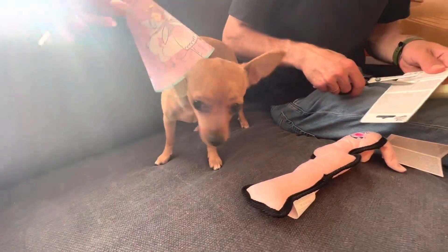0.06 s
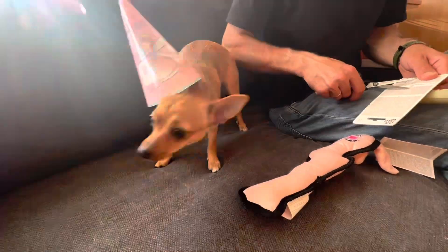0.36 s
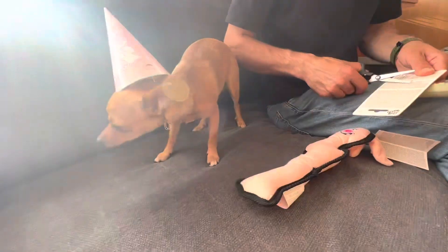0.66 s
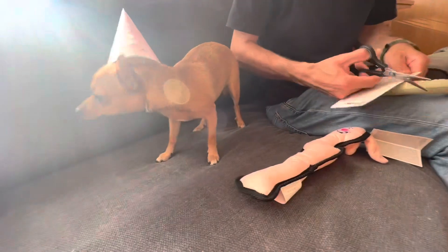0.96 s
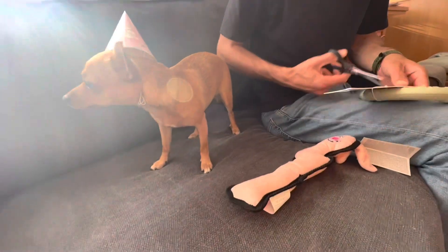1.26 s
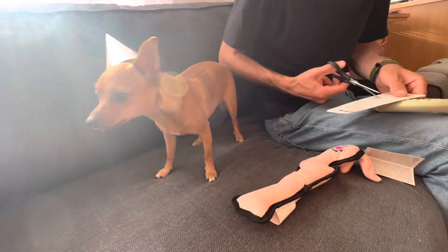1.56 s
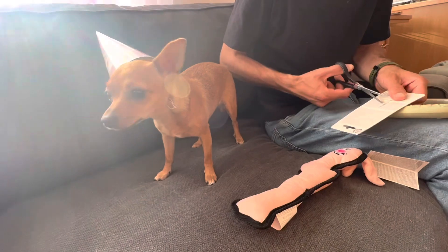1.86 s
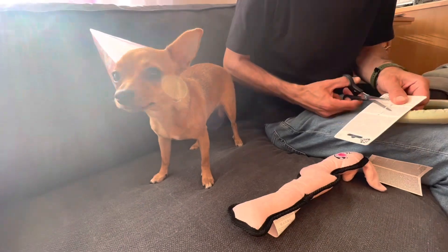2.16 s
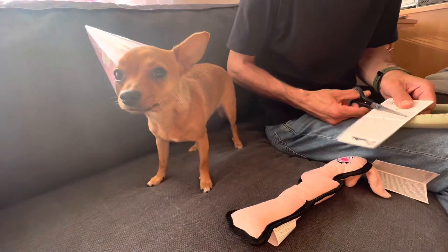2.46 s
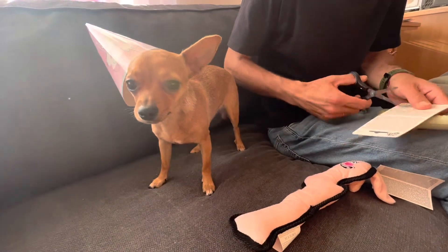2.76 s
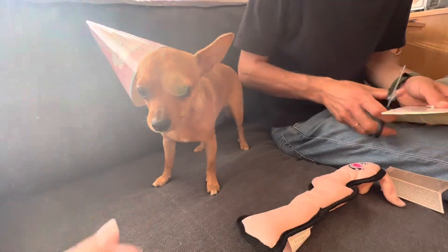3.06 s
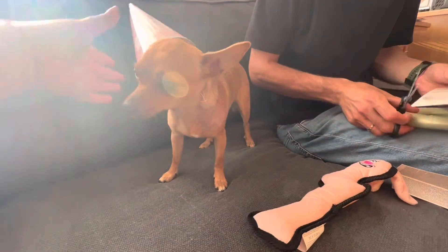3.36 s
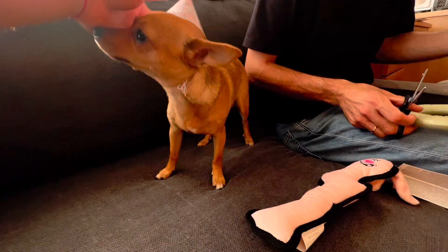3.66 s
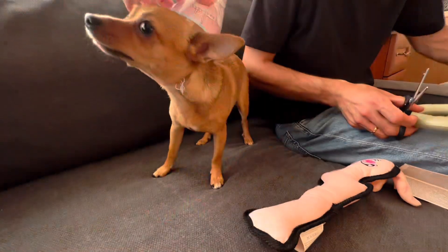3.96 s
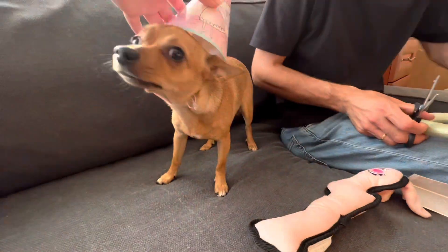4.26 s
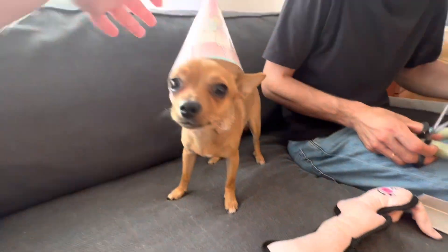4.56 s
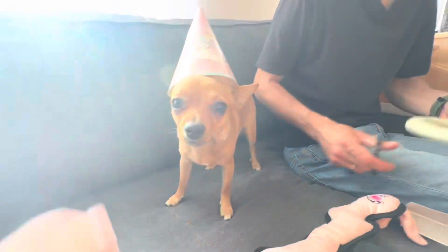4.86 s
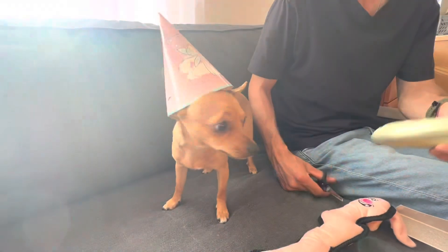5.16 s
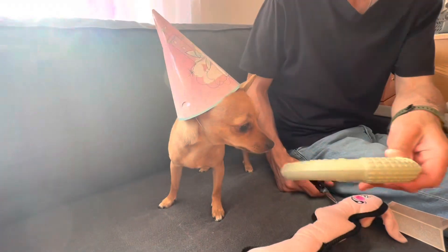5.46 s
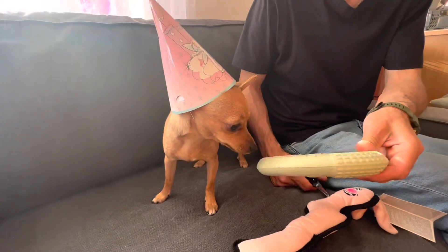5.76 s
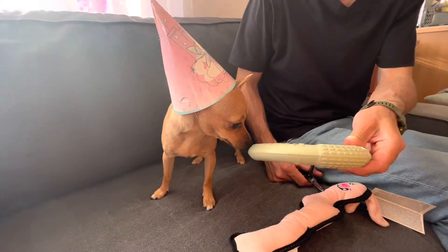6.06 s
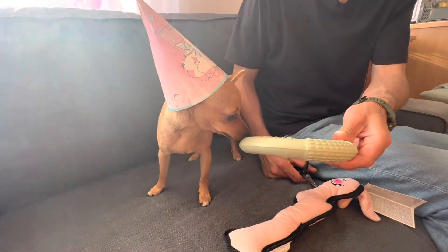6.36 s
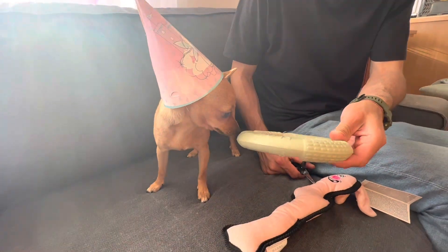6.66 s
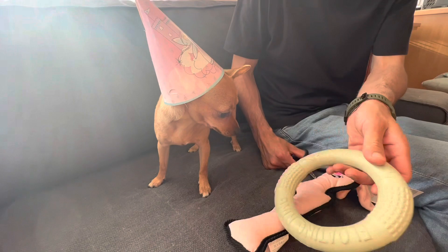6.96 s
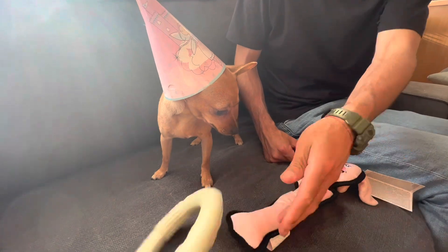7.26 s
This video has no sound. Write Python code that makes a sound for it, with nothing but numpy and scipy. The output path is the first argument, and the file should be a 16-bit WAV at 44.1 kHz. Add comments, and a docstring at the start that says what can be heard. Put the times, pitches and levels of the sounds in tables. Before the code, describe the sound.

Scissors snip two plastic ties amid light clicks, paper rustles and cushion thumps, then a rubber ring lands softly, over a low hum.

```python
"""On a sofa in a small room, over a mains hum and a faint hiss, a small dog's paper hat rustles.
Scissors click, then snip two plastic ties off a toy's backing card, at 0.8 s and 2.4 s: each tie
cracks, and the blades ring. Meanwhile the card is bumped and sleeves slide over jeans.
Hands and paws then thump the cushions, the scissors click on, and near 4 s the hat rustles again.
Last, cloth swishes as a rubber ring is held out, and at 7.3 s it is tossed down with a soft thud."""
import sys
import numpy as np
from scipy import signal
from scipy.fft import rfft, irfft, next_fast_len
from scipy.io import wavfile

SR = 44100
rng = np.random.default_rng(int(sys.argv[2]) if len(sys.argv) > 2 else 0)


def put_to_file(sound):
    """Save the sound as 16-bit audio at rate SR, in the file named by the first command-line argument."""
    columns = np.atleast_2d(sound).T  # one column per channel
    safe = np.clip(columns, -1, 1)
    whole_steps = np.round(safe * 32767)
    wavfile.write(sys.argv[1], SR, whole_steps.astype(np.int16))


N = 327164
HIT_SIZE = 16384  # samples in one short sound
TIME, AGE = np.arange(N) / SR, np.arange(HIT_SIZE) / SR  # seconds into the scene, and into a hit
TOP_HZ, CUSHION_DECAY_S = 15800, 0.051

# mains hum and a weaker low drone: pitch_hz, level_db
HUM_TONES = [(99.95, -51), (130, -66)]
# tone colour of the room's still air: pitch_hz, gain_db
AIR_COLOUR = [(130, -26.5), (280, -28), (450, -34), (850, -36), (1400, -40.5), (2500, -47), (4000, -47),
              (5000, -44), (6000, -52.5), (7200, -43), (8500, -48), (10500, -64), (15000, -58)]
# a narrow hiss and a faint whine: pitch_hz, width_hz, level_db
HISS_BANDS = [(2000, 170, -71), (6740, 42, -79)]
# the room's echo (a fade is the time to drop by 60 dB): pitch_hz, fade_s, gain_db
ROOM_ECHO = [(200, 0.24, -3), (380, 0.2, -9), (822, 0.26, -1), (1750, 0.53, -13), (4000, 0.41, -10),
             (8660, 0.38, -3), (14700, 0.089, -18.5)]
# tone colour of the rustling hiss, with a deep dip near 11 kHz: pitch_hz, gain_db
RUSTLE_COLOUR = [(200, -2), (600, 0.5), (1300, -2.5), (1800, 3.5), (2300, -12.5), (2900, 4), (4000, 5),
                 (6500, 1), (9000, 2.5), (11000, -20.5), (13000, -3), (15500, -16.5)]
# the hat rubs as the dog turns and a hand sets it straight: start_s, length_s, level_db
PAPER_RUBS = [(0.02, 0.034, -52), (0.225, 0.033, -44.5), (3.655, 0.047, -49.5), (3.72, 0.12, -57.5),
              (3.91, 0.074, -53), (3.96, 0.084, -52.5), (4.08, 0.024, -52)]
# hollow notes of the hat's paper cone, compared with its hiss: low_hz, high_hz, gain_db
HAT_BANDS = [(726, 983, -4.5), (1750, 2200, -13.5), (2700, 3650, -14)]
# hands and sleeves slide over card and jeans: start_s, length_s, hiss_db, fabric_db
SLEEVE_SLIDES = [(0.13, 0.13, -62, -63.5), (0.513, 0.43, -66, -94), (1.32, 0.2, -67, -65),
                 (2.018, 0.34, -67.5, -68.5), (2.56, 0.53, -62.5, -69.5), (3.084, 0.19, -58.5, -62.5),
                 (4.25, 0.035, -62.5, -58.5), (4.61, 0.14, -63, -86), (4.816, 0.48, -64.5, -67),
                 (5.607, 0.19, -71.5, -69), (7.244, 0.025, -53, -64)]
# cloth swishes as the ring is held out: start_s, length_s, level_db
CLOTH_SWISHES = [(5.64, 0.022, -58), (5.95, 0.054, -65.5), (6.36, 0.072, -69)]
# dull knocks on card and hat: start_s, level_db, decay_s, left_minus_right_db
CARD_KNOCKS = [(0.931, -39, 0.0053, -4), (1.206, -43, 0.075, 6), (1.535, -43.5, 0.047, 5),
               (1.897, -41.5, 0.056, -10), (1.919, -41.5, 0.043, 13), (3.113, -50, 0.011, -6),
               (3.905, -43, 0.0047, 8), (5.111, -54, 0.041, 5), (5.201, -52, 0.023, 6)]
# hands and paws press into the cushions: start_s, level_db, pitch_hz
CUSHION_THUMPS = [(2.572, -34, 80), (3.271, -36.5, 60.7), (3.963, -35, 73.6), (4.156, -38.5, 227),
                  (5.109, -42.5, 200)]
# the rubber ring is let go, then lands: start_s, thump_db, contact_s
RUBBER_HITS = [(7.2639, -38, 0.002), (7.271, -31.5, 0.0089), (7.396, -31, 0.0017), (7.3974, -26.5, 0.0013)]
# the rubber's very short tones, compared with its slap: pitch_hz, gain_db, decay_s
RUBBER_TONES = [(277, 2.5, 0.00085), (980, -3.5, 0.0016), (3340, -10, 0.00052)]
# the blades scrape as they move: start_s, length_s, level_db
BLADE_SCRAPES = [(0.565, 0.035, -66), (1.425, 0.02, -56), (2.862, 0.024, -57), (5.19, 0.034, -63),
                 (7.09, 0.015, -63)]
# light clicks of blades, pivot and plastic: start_s, base_db, pitch_hz, tone_gain_db, treble_gain_db
SCISSOR_CLICKS = [(0.038, -47, 2050, 7.5, -11), (0.6285, -67.5, 4000, 16, 11), (0.685, -64, 4750, 17, -6),
                  (0.705, -34, 2400, 1.5, -13), (1.201, -50.5, 1490, 5, -7.5),
                  (1.215, -57.5, 5370, 8.5, -7), (1.25, -35.5, 1310, -4.5, -26),
                  (1.4983, -35, 1780, -7, -28), (1.727, -37, 4380, -1.5, -19),
                  (1.895, -47.5, 1480, 2.5, -6), (2.702, -52, 2180, -2, -11), (2.714, -41, 1560, -1.5, -21),
                  (3.172, -49.5, 1400, 3.5, -11), (3.2571, -43.5, 3870, -5, -1),
                  (3.898, -46.5, 2600, -4, -11.5), (4.125, -61, 5670, -8, 5),
                  (4.8813, -44.5, 2700, -0.5, 4)]
# short tones of clicking steel, muffled by the hand: pitch_hz, gain_db, fade_s
CLICK_TONES = [(870, -17, 0.016), (1490, -9, 0.024), (2250, -11, 0.014), (2700, -16, 0.012),
               (4150, -11.5, 0.011), (4750, -15, 0.011)]
# tone colour of a crack on the card: pitch_hz, gain_db
CRACK_COLOUR = [(380, -31), (700, -8.5), (1080, -3.5), (1400, 1.5), (2200, 0), (3200, -8), (4200, -8.5),
                (5600, -6.5), (7600, -9.5), (8800, -5), (11300, -13.5), (13500, -3), (16000, -19)]
# scissors and card ring with each crack: pitch_hz, gain_db, fade_s
CRACK_TONES = [(505, -17.5, 0.055), (888, -12.5, 0.07), (1220, -17, 0.045), (1394, -13.5, 0.025),
               (1830, -12, 0.06), (2110, -13, 0.03), (2650, -18, 0.03), (2920, -16, 0.045),
               (4040, -19, 0.02), (4770, -17.5, 0.022), (6250, -23, 0.035)]
# the blades ring on after a snip: pitch_hz, gain_db, fade_s
BLADE_TONES = [(1455, -25, 0.8), (1502, -22.5, 1.1), (1534, -22, 1.1), (1590, -24, 0.8), (1815, -23, 0.45)]
# the scissors close on a tie, which snaps:
# start_s, base_db, closing_s, snap_gain_db, snap_pitch_hz, snap_treble_gain_db, ring_gain_db
TIE_SNIPS = [(0.8391, -25, 0.0034, 3, 4040, -11, 1), (2.4441, -24.5, 0.0063, -1.5, 4840, 5.5, -8)]
# the left microphone is shaded from the scissors: pitch_hz, left_minus_right_db
LEFT_SHADE = [(200, 6), (600, -3), (1000, -8), (2000, -9.5), (4000, -2.5), (9000, 3)]


def undb(db):
    """Turn decibels into a number to multiply by."""
    return 10 ** (np.asarray(db) / 20)


def level(x, db):
    """Set the average (rms) level of a steady sound."""
    return x * undb(db) / np.sqrt(np.mean(x ** 2))


def hit_level(x, db):
    """Give a hit the energy of 4 ms of steady sound at this level."""
    return x * undb(db) * np.sqrt(.004 * SR / np.sum(x ** 2))


def band(x, low_hz, high_hz, order=2):
    """Keep what lies between two pitches; a higher order cuts more sharply."""
    edges_hz = [low_hz, min(high_hz, SR / 2 - 1)]
    return signal.sosfilt(signal.butter(order, edges_hz, "band", fs=SR, output="sos"), x)


def colour(x, points):
    """Turn pitches up or down along a curve of (pitch_hz, gain_db) points."""
    size = 2 * next_fast_len(x.shape[-1] // 2 + 1)
    hz, db = np.transpose(points)
    curve_db = np.interp(np.log(np.fft.rfftfreq(size, 1 / SR) + 1), np.log(hz), db)
    cepstrum = irfft(np.log(undb(curve_db)))
    # fold the filter in time so that nothing sounds before its cause
    cepstrum[1:size // 2] *= 2
    cepstrum[size // 2 + 1:] = 0
    return irfft(rfft(x, size) * np.exp(rfft(cepstrum)))[..., :x.shape[-1]]


def pan(x, db):
    """Make the left side this many decibels louder than the right."""
    return x * undb(np.array([[db], [-db]]) / 2)


def stereo_noise(likeness):
    """Left and right noise: unrelated at likeness 0, the same at 1."""
    mid, side = rng.standard_normal((2, N))
    return np.sqrt((1 + likeness) / 2) * mid + np.sqrt((1 - likeness) / 2) * side * np.array([[1], [-1]])


def wander(rate_hz):
    """Glide from one random value to the next, mostly between -1 and 1."""
    values = rng.standard_normal(HIT_SIZE)
    return np.interp(TIME * rate_hz, np.arange(len(values)), values)


def burst(decay_s, rise_s=0):
    """A puff of noise that builds up and dies away."""
    onset = np.minimum((AGE + 1 / SR) / (rise_s + 1 / SR), 1)
    return rng.standard_normal(HIT_SIZE) * np.exp(-AGE / decay_s) * onset


def tone(hz, decay_s):
    """One pure note that dies away."""
    return np.sin(2 * np.pi * hz * AGE) * np.exp(-AGE / decay_s)


def ringing(tones, scatter_db=0.5):
    """Each hit wakes an object's tones a little differently; neighbouring tones swing opposite ways."""
    chance_db = scatter_db * rng.standard_normal(len(tones))
    return sum((-1) ** k * hit_level(tone(hz, fade_s / np.log(1000)), db + chance_db[k])
               for k, (hz, db, fade_s) in enumerate(tones))


def add(out, start_s, x):
    """Mix a hit in at its time."""
    i = int(start_s * SR)
    out[:, max(i, 0):i + x.shape[-1]] += x[..., max(-i, 0):N - i]


def background():
    """A wavering mains hum, a low rumble and a wide, faint hiss."""
    hum = sum(undb(db) * np.sqrt(2) * np.sin(2 * np.pi * hz * TIME) for hz, db in HUM_TONES)
    hum *= undb(1.9 * wander(31))
    low_noise = band(stereo_noise(1.0), 50, 77.7, order=1)
    rumble = level(band(low_noise, 22, 250, order=3), db=-57)
    air = band(colour(stereo_noise(0.024), AIR_COLOUR), 120, TOP_HZ)
    air = level(air, db=-64.5) * undb(.5 * wander(16))
    hiss = sum(level(band(stereo_noise(0.041), hz - width / 2, hz + width / 2, order=1), db)
               for hz, width, db in HISS_BANDS)
    return pan(hum + rumble, 4.0) + pan(air + hiss, 1.0)


def room(x, build_s=0.0024, early_db=-11, early_s=0.028, linger_db=-26, linger_hz=1570, linger_s=0.41):
    """Near surfaces answer first, then a wash of echo; the top treble dies soonest, one band lingers."""
    hz, fade_s, db = np.transpose(ROOM_ECHO)
    # cut noise into pitches and let each fade at its own speed
    pitches, times, cells = signal.stft(rng.standard_normal((2, 2 * HIT_SIZE)), SR, nperseg=256)
    fall = np.log(1000) / np.interp(pitches, hz, fade_s)[:, None]
    gain = undb(np.interp(pitches, hz, db))[:, None] * np.sqrt(2 * fall / SR)
    tail = signal.istft(cells * gain * np.exp(-fall * times), SR)[1]
    age = np.arange(tail.shape[1]) / SR
    early, late = rng.standard_normal((2,) + tail.shape)
    early = early * np.exp(-age / early_s) * undb(early_db) * np.sqrt(2 / early_s / SR)
    late = band(late, linger_hz / 2.8, linger_hz)
    late = late * np.exp(-age / linger_s) * undb(linger_db) * np.sqrt(2 / linger_s / SR)
    response = (tail + early + late) * (1 - np.exp(-(age / build_s) ** 2))
    return signal.fftconvolve(x.mean(axis=0)[None], response, axes=1)[:, :N]


def rub_strength(rubs, attack_s=0.04, release_s=0.05):
    """Each rub swells and dies away; overlapping rubs add their power."""
    power = np.zeros(N)
    for start_s, length_s, db in rubs:
        attack = np.clip((TIME - start_s) / attack_s, 0, 1)
        release = np.exp(-np.maximum(TIME - start_s - length_s, 0) / release_s)
        power += (undb(db) * attack * release) ** 2
    return np.sqrt(power)


def friction(rubs, low_hz, high_hz, grain_db=3.0):
    """Grainy rubbing in one narrow band of pitches."""
    grainy = stereo_noise(0.14) * undb(grain_db * wander(300))
    return level(band(grainy, low_hz, high_hz), 0) * rub_strength(rubs)


def crackles(bands=4, ticks_per_s=110, spread_db=3):
    """Scattered tiny ticks of unequal size, some higher and some lower."""
    out = 0
    for hz in np.geomspace(2400, 6000, bands):
        sizes = undb(spread_db * np.clip(rng.standard_normal(N), -2, 2))
        kicks = (rng.random(N) < ticks_per_s / bands / SR) * sizes
        ticks = signal.fftconvolve(kicks, burst(0.0012))[:N]
        out = out + level(band(ticks, hz / 1.5, hz * 1.5, order=3), 0)
    return level(out, db=-8)


def rustle(jerk_db=1.23):
    """Paper and cloth catch and slip; the cone of the hat adds a hollow note and a rasp."""
    on_hat = rub_strength(PAPER_RUBS)
    on_card = rub_strength([(start_s, length_s, db) for start_s, length_s, db, _ in SLEEVE_SLIDES])
    on_fabric = rub_strength([(start_s, length_s, db) for start_s, length_s, _, db in SLEEVE_SLIDES])
    catch = undb(jerk_db * wander(70))
    hiss = level(colour(stereo_noise(0.04) * catch, RUSTLE_COLOUR), 0)
    hiss = level(hiss + crackles(), 0)
    # the cone's notes come and go as the fingers move over it
    hat = sum(level(band(stereo_noise(0.071) * catch * undb(3.5 * wander(45)), low_hz, high_hz), db)
              for low_hz, high_hz, db in HAT_BANDS)
    fabric = level(band(stereo_noise(0.076) * catch, 440, 4000), 0)
    return pan(hiss * np.hypot(on_hat, on_card) + hat * on_hat + fabric * on_fabric, 1.2)


def knock(db, hz, decay_s, spread=1.53):
    """A dull knock: a puff of noise spread widely around one pitch."""
    body = band(burst(decay_s), hz / spread, hz * spread, order=1)
    return hit_level(band(body, 120, 4720), db)


def thump(db, hz, decay_s):
    """A soft, low blow, a little to the left."""
    body = band(burst(decay_s), hz / 1.6, hz * 1.264, order=3)
    return pan(hit_level(body, db), 4.5)


def handling():
    """Card and hat are bumped, the freed card springs back after each snip, the cushions are pressed."""
    out = np.zeros((2, N))
    for start_s, db, decay_s, pan_db in CARD_KNOCKS:
        hz = 704 * (decay_s / .01) ** -0.17  # a softer contact lasts longer and sounds lower
        add(out, start_s, pan(knock(db, hz, decay_s), pan_db))
    for start_s, db, *_ in TIE_SNIPS:
        add(out, start_s + 0.0037, thump(db - 14.5, hz=204.5, decay_s=0.0255))
    for start_s, db, hz in CUSHION_THUMPS:
        add(out, start_s, thump(db, hz, CUSHION_DECAY_S))
    return out


def rubber_ring(scuff_hz=3620, scuff_spread=1.34, sink_lag_s=0.0022):
    """Each contact slaps the rubber, scuffs the fabric and sinks into the cushion."""
    out = np.zeros((2, N))
    for start_s, db, contact_s in RUBBER_HITS:
        slap_db = db - 21 + 6 * np.log2(.01 / contact_s)  # a shorter contact slaps harder
        tones = sum(hit_level(tone(hz, decay_s), slap_db + gain_db)
                    for hz, gain_db, decay_s in RUBBER_TONES)
        slap = knock(slap_db, hz=543, decay_s=contact_s, spread=1.44)
        add(out, start_s, pan(slap + tones, 10))
        slips = burst(contact_s, rise_s=contact_s / 2)
        scuff = band(slips, scuff_hz / scuff_spread, scuff_hz * scuff_spread, order=3)
        add(out, start_s, pan(hit_level(scuff, db - 15), -8))
        add(out, start_s + sink_lag_s, thump(db, hz=103, decay_s=0.027))
    return out


def from_right(x, left_lag_s=0.0003017):
    """Sound from the right reaches the left microphone later, with weaker middle pitches."""
    delayed = np.interp(TIME - left_lag_s, TIME, x[0])
    left = colour(delayed, [(hz, db / 2) for hz, db in LEFT_SHADE])
    right = colour(x[1], [(hz, -db / 2) for hz, db in LEFT_SHADE])
    return np.array([left, right])


def swell(db, rise_s):
    """A faint puff of noise swells just before each crack and click."""
    rising = burst(rise_s)[::-1]
    return hit_level(band(colour(rising, CRACK_COLOUR), 820, 4500), db)


def click(db, hz, tone_db, treble_db, decay_s=0.0021, rise_s=0.0006, split_hz=5300):
    """A gritty contact rings the hand-held steel; the part that is hit adds its own short tone."""
    grit = hit_level(band(burst(decay_s, rise_s), 1200, split_hz), -7)
    edge = hit_level(band(burst(decay_s / 2, rise_s), split_hz, TOP_HZ), treble_db)
    ring = ringing(CLICK_TONES, scatter_db=3.0) + hit_level(tone(hz, decay_s=0.0014), tone_db)
    return undb(db) * (grit + edge + ring * (1 - np.exp(-AGE / rise_s)))


def crack(db, hz, treble_db, body_db=3.0, crackle_s=0.0022, split_hz=5500):
    """A sudden release and its crackle: the card gives the body, the breaking edge the treble."""
    push = hit_level(1. * (AGE == 0), 0) + hit_level(burst(crackle_s), 11)
    body = hit_level(band(colour(push, CRACK_COLOUR), 420, split_hz, order=3), body_db)
    ping = hit_level(tone(hz, decay_s=0.00098), -5)
    edge = band(colour(burst(crackle_s), CRACK_COLOUR), split_hz, TOP_HZ, order=3)
    return undb(db) * (body + ping + hit_level(edge, treble_db) + undb(body_db) * ringing(CRACK_TONES))


def scissors(blade_hz=1730, parting_share=0.52):
    """Each snip is three cracks and a ring of steel; the scissors also click as they are handled."""
    out = np.zeros((2, N))
    lead_s = HIT_SIZE / SR  # a swell starts this early, so it ends on its hit
    for start_s, db, closing_s, snap_db, snap_hz, treble_db, ring_db in TIE_SNIPS:
        blades_bite = (start_s, db, blade_hz, -27)
        tie_parts = (start_s + parting_share * closing_s, db + snap_db, snap_hz, treble_db)
        blades_shut = (start_s + closing_s, db + 0.06, blade_hz, -13.5)
        for at_s, crack_db, hz, edge_db in (blades_bite, tie_parts, blades_shut):
            add(out, at_s - lead_s, swell(crack_db - 13, rise_s=0.006))
            add(out, at_s, crack(crack_db, hz, edge_db))
        add(out, start_s + closing_s, undb(db + ring_db) * ringing(BLADE_TONES))
    for start_s, db, hz, tone_db, treble_db in SCISSOR_CLICKS:
        add(out, start_s - lead_s, swell(db - 12, rise_s=0.002))
        add(out, start_s, click(db + 1.5, hz, tone_db, treble_db))
    return out


def scene(directions=3):
    """Mix everything on the sofa with the room's echo and the background."""
    snips = scissors()
    knocks = handling() + rubber_ring()
    # a crack sends a different sound towards each wall, so its echo is smoother than the direct sound
    beams = [snips] + [scissors() for _ in range(directions - 1)]
    echo = sum(room(beam + knocks) for beam in beams) / np.sqrt(directions)
    scrapes = friction(BLADE_SCRAPES, low_hz=3380, high_hz=4670)
    swishes = friction(CLOTH_SWISHES, low_hz=1700, high_hz=2920)
    return from_right(snips) + knocks + echo + scrapes + swishes + rustle() + background()


def record(dry):
    """The whole sound has a narrow dip in the treble, and the very top is cut off."""
    dipped = signal.lfilter(*signal.iirnotch(7650, 14, SR), dry)
    return signal.sosfilt(signal.ellip(8, .2, 70, TOP_HZ, fs=SR, output="sos"), dipped)


dry = scene()
out = record(dry)
put_to_file(out)
```